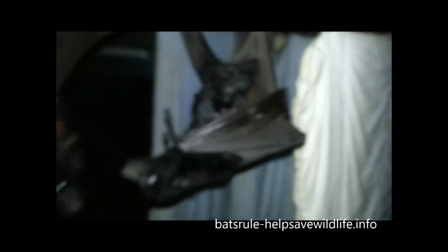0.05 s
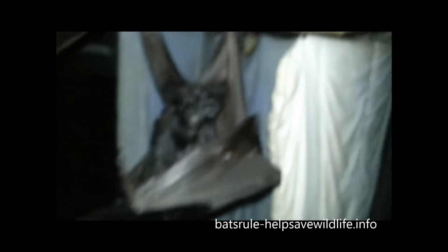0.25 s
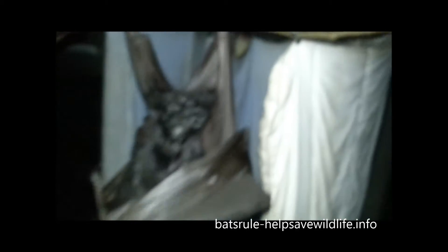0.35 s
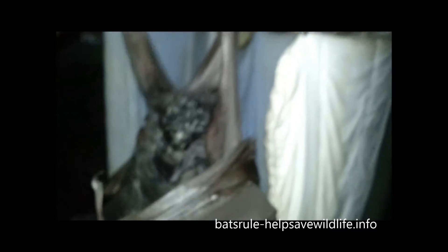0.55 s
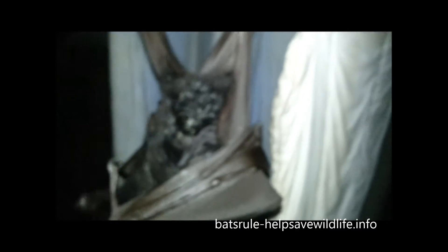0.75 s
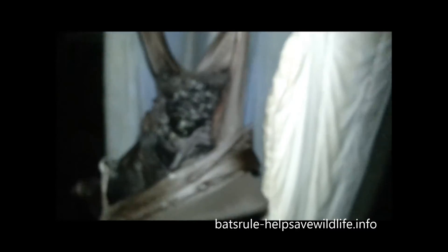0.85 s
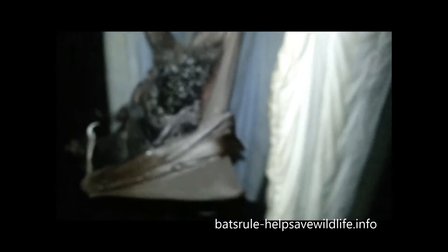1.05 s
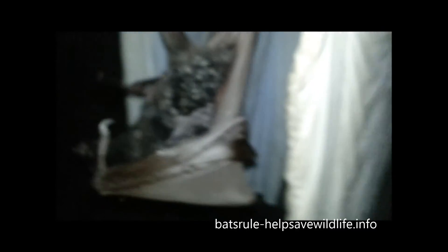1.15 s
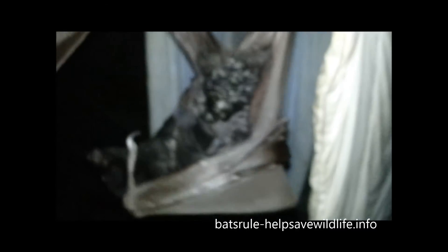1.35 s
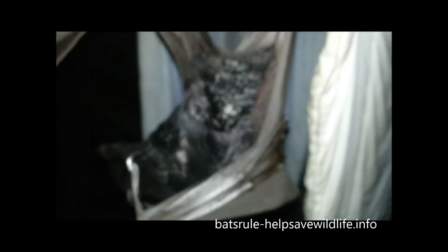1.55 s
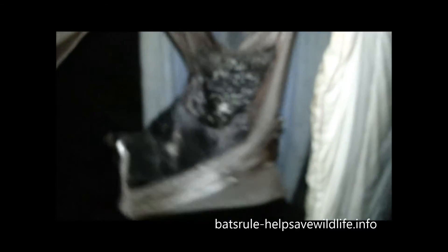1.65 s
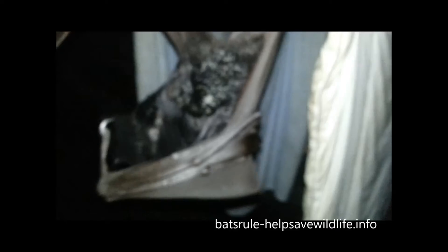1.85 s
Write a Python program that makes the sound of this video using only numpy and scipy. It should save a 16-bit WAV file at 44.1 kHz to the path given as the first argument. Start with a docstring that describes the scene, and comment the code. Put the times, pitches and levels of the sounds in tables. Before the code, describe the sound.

Close to the microphone, a bat lets out a short piercing shriek that roughens into a rapid throaty rasp with squeaky chirps, ends with a low knock and cloth rustle, leaving faint airy room noise and a few ticks.

```python
"""A fruit bat screeches close to the microphone in a small cloth-hung enclosure. A whine of gliding overtones
rises and flares in two mouth resonances as a shrill cry, then roughens. Short gliding sine squeaks and hisses
cut through a hoarse rasp of noisy throat pulses; loud peaks overload. Soft rustles, one short knock and faint
ticks are shaped noise, over quiet background noise."""
import sys
import numpy as np
from scipy import signal
from scipy.fft import rfft, irfft
from scipy.io import wavfile
from scipy.ndimage import uniform_filter1d, map_coordinates

SR = 44100
rng = np.random.default_rng(int(sys.argv[2]) if len(sys.argv) > 2 else 0)


def store_wav(level_fs):
    """Save 16-bit WAV to argv[1]."""
    pcm = np.round(np.clip(np.atleast_2d(level_fs), -1, 1) * 32767)
    wavfile.write(sys.argv[1], SR, pcm.T.astype(np.int16))


N = 83790
T = np.arange(N) / SR


def from_db(db):
    """Decibels to gain."""
    return 10 ** (np.asarray(db) / 20)


def rms_one(x):
    """Scale to unit power."""
    return x / np.sqrt(np.mean(x ** 2) + 1e-20)


def even(x, size):
    """Hold the short-term power at one, over a window of so many samples."""
    return x / np.sqrt(np.abs(uniform_filter1d(x * x, size)) + 1e-12)


def in_time(rows):
    """Draw each column of a timed table as a curve over every sample."""
    s, *columns = np.transpose(rows)
    return [np.interp(T, s, column) for column in columns]


def during(rows):
    """One while a timed table lasts, fading exponentially outside it."""
    outside_s = np.maximum(rows[0][0] - T, T - rows[-1][0])
    return np.exp(-np.maximum(outside_s, 0) / .003)


def per_bin(points):
    """Read a spectrum table at every frequency bin, on a log frequency axis."""
    hz, value = np.transpose(points)
    bin_hz = np.arange(N // 2 + 1) * SR / N
    return np.interp(np.log(bin_hz + 1), np.log(hz), value)


def noise(colour):
    """Stereo noise of a given colour, independent on each side."""
    spectrum = rfft(rng.standard_normal((2, N)))
    return rms_one(irfft(spectrum * from_db(per_bin(colour)), N))


def drift(rate):
    """Smooth random motion of unit power: noise through two equal low-pass poles at a rate in Hz."""
    r = np.exp(-2 * np.pi * rate / SR)
    return rms_one(signal.lfilter([1], [1, -2 * r, r * r], rng.standard_normal(N)))


def band_noise(hz, width):
    """Air noise in one resonance whose centre may move, held at even power."""
    turn = 2 * np.pi * np.cumsum(hz * np.ones(N)) / SR
    return even(drift(width) * np.sin(turn) + drift(width) * np.cos(turn), size=200)


def resonate(x, hz, width):
    """A two-pole resonance applied twice, for steep skirts."""
    r = np.exp(-np.pi * width * np.sqrt(2) / SR)  # each pass is wider than the pair
    section = [(1 - r * r) / 2, 0, (r * r - 1) / 2, 1, -2 * r * np.cos(2 * np.pi * hz / SR), r * r]
    return signal.sosfilt([section, section], x + 1e-18)


def throat(x):
    """The resonances of throat and mouth, ringing in parallel."""
    # resonances: centre_hz, width_hz, gain_db
    formants = [(491, 140, -16.5), (920, 420, -22), (2162, 230, 3.5), (2645, 420, -2.5), (3530, 850, -8),
                (5340, 1100, -2.5), (6440, 1800, -30), (9280, 760, -17.5), (11300, 1200, -18.5)]
    return sum(from_db(db) * resonate(x, hz, width) for hz, width, db in formants)


def background():
    """Quiet air noise and hiss; how alike the two sides are depends on frequency."""
    # colour of the air noise: frequency_hz, relative level per Hz in dB
    air_colour = [(25, -15.5), (60, -13), (130, -4), (230, 0.5), (420, 1), (680, -3.5), (1000, -3.5),
                  (1400, -6.5), (3000, -11), (4400, -11), (5700, -19), (9000, -18.5), (14000, -17.5)]
    # likeness of left and right: frequency_hz, correlation (-1 to 1)
    likeness = [(60, 0), (130, 0.041), (280, .5), (620, 0.49), (1340, -0.3), (2900, 0.091)]
    # slow swell of the noise: time_s, level_db
    air_level = [(0, -53.5), (.75, -52), (1.2, -53.5), (1.55, -52), (1.9, -51)]
    mid, side = rfft(noise(air_colour))
    alike = np.clip(per_bin(likeness), -1, 1)
    both = irfft(np.sqrt(1 + alike) * mid + np.sqrt(1 - alike) * side * [[1], [-1]], N)
    return rms_one(both) * from_db(in_time(air_level)[0])


def cry():
    """A rising whine whose overtones flare in two mouth resonances, turning rough as it breaks."""
    # voice of the opening cry: time_s, pitch_hz, fundamental_db, roughness (0 to 1)
    voice_path = [(.163, 640.2, -58, .1), (.171, 688, -43, 0), (.184, 766.7, -32.5, .05),
                  (.199, 956, -20, 0.09), (.206, 948, -20, 0.12), (.209, 888.7, -19.5, 0.9),
                  (.214, 873.3, -21, 0.26), (.221, 884.9, -18, .18), (.231, 998.5, -16, 0),
                  (.242, 1028, -17, 0.02), (.248, 917.6, -19.5, 0.5), (.256, 807, -30.5, 0.8),
                  (.275, 731, -63.5, 0.7)]
    # the mouth opens, resonances take over: time_s, lower_db, upper_db, upper_centre_hz
    mouth_path = [(.165, -71.5, -73, 4500), (.192, -51, -58.5, 4500), (.2065, -47, -54.5, 4582),
                  (.208, -18, -15.5, 4607), (.2105, -15.5, -4.5, 4740), (.214, -21.5, -14.5, 4475),
                  (.220, -24.5, -9, 4398), (.224, -19.5, -20, 4176), (.229, -11, -9, 3930),
                  (.235, 0.5, -30, 3983), (.243, -0.5, -29.5, 3966), (.250, -10.5, -11, 2839),
                  (.263, -16, -24.5, 2800), (.280, -36.5, -47.5, 2786)]
    # steady resonances colouring the whine: centre_hz, width_hz, gain_db
    whine_peaks = [(1420, 64, 1.5), (2690, 340, -9)]
    lower_hz, lower_width_hz, upper_width_hz = 2122, 480, 470
    whine_db_per_octave = -32
    pitch_jitter, overtone_wobble_db = .078, 1.12
    hiss_db, hiss_follows = -13, .8  # level at a 0 dB resonance; share of the resonances' dB swing

    hz, whine_db, rough = in_time(voice_path)
    lower_db, upper_db, upper_hz = in_time(mouth_path)
    phase = 2 * np.pi * np.cumsum(hz * (1 + pitch_jitter * rough * drift(700))) / SR
    k = np.arange(1, 10)[:, None]  # harmonic numbers
    partials = np.sin(k * phase + rng.uniform(0, 2 * np.pi, k.shape))
    # from the third harmonic up, each one flutters on its own
    partials[2:] *= from_db(overtone_wobble_db * np.array([drift(300) for _ in k[2:]]))

    def peak(centre, width):
        """Gain of each overtone in a resonance; the fundamental gets none."""
        detune = (k * hz / centre - centre / (k * hz)) * centre / width
        return (1 + detune ** 2) ** -.8 * (k > 1)

    whine = from_db(whine_db_per_octave * np.log2(k))
    whine = whine + sum(from_db(db) * peak(centre, width) for centre, width, db in whine_peaks)
    out = from_db(whine_db) * np.sqrt(2) * (whine * partials).sum(0)

    # roughness trades tone for breath at constant power
    resonances = ((lower_hz, lower_width_hz, lower_db), (upper_hz, upper_width_hz, upper_db))
    for centre, width, db in resonances:
        weights = peak(centre, width)
        tone = (weights * partials).sum(0) / np.sqrt((weights ** 2).sum(0) / 2)
        air = band_noise(centre, width) * (1 + .33 * np.sin(phase))  # breath pulses with the pitch
        out += from_db(db) * (np.sqrt(1 - rough ** 2) * tone + rough * air)

    # broad hiss of the open mouth
    hiss = rms_one(throat(rng.standard_normal(N)))
    out += hiss * from_db(hiss_db + hiss_follows * np.maximum(lower_db, upper_db))
    return out * during(voice_path)


def two_ports(voice):
    """As the head turns, the voice reaches the left port later, with less treble and more bass."""
    # the head turns: time_s, left_delay_ms
    head_path = [(.20, 0.14), (.245, 0.24), (.33, .28), (.51, 0.31)]
    left_gain_db, treble_shadow_db, shadow_hz = 2.78, -12.5, 4200
    low_cut = signal.butter(3, 330, "high", fs=SR, output="sos")  # the microphone cuts the low bass
    right = signal.sosfilt(low_cut, voice)
    bass = signal.sosfiltfilt(signal.butter(3, shadow_hz, fs=SR, output="sos"), right)
    treble = right - bass
    left = (bass + from_db(treble_shadow_db) * treble) * from_db(left_gain_db)
    lag_s = in_time(head_path)[0] / 1000
    late_left = map_coordinates(left, [(T - lag_s) * SR], order=3, mode="nearest")
    return np.array([late_left, right])


def enclosure(x):
    """A short dull tail of dense reflections, decaying noise that differs at each port."""
    t60_s, gap_s, dull_hz, level_db = .14, .003, 7500, -13
    t = T[:SR // 2]
    tail = rng.standard_normal((2, len(t))) * from_db(-60 * t / t60_s) * (t > gap_s)
    tail /= np.sqrt((tail ** 2).sum(1, keepdims=True))
    tail = signal.sosfilt(signal.butter(1, dull_hz, fs=SR, output="sos"), tail)
    return from_db(level_db) * signal.fftconvolve(x, tail, axes=1)[:, :N]


def squeaks():
    """Near-pure whistles that swell and glide, each with a faint octave above."""
    # squeaks: peak_s, attack_s, release_s, level_db, pitch_hz at the peak, glide in octaves per s
    whistles = [(0.2537, .0025, .004, 0, 2080, -5.5), (.268, .006, 0.01, -25.5, 2030, -9),
                (.298, 0.0029, .004, -26, 1406, 14.5), (0.307, .003, .005, -41, 1972, 1),
                (0.3255, 0.0026, 0.0054, -7, 2152, 0), (0.333, 0.0023, .005, -11.5, 2169, 4.5),
                (.359, .008, .010, -24.5, 2477, -5), (.505, 0.0021, .004, -11, 2523, -9.5),
                (.513, .004, .0027, -5, 2195, -20), (0.518, .002, 0.0035, -8, 2100, -6.5),
                (.529, .002, .005, -20.5, 2100, -3.5)]
    pitch_jitter, octave_db = .018, -30.5
    out = np.zeros(N)
    waver = 1 + pitch_jitter * drift(284)
    for s, attack, release, db, hz, glide in whistles:
        t = T - s
        pitch = hz * waver * 2 ** (glide * np.clip(t, -.02, .02))
        phase = 2 * np.pi * np.cumsum(pitch) / SR
        swell = np.exp(-(t / np.where(t < 0, attack, release)) ** 2)
        tone = np.sin(phase) + from_db(octave_db) * np.sin(2 * phase)
        out += from_db(db) * np.sqrt(2) * swell * tone
    return out


def rasp():
    """Irregular throat pulses, each with a puff of air, ring the resonances of the mouth."""
    # effort of the hoarse rasp: time_s, level_db
    effort = [(.317, -59.5), (.322, -23), (.330, -24), (.357, -20), (.364, -29), (.377, -28.5), (.391, -18),
              (.426, -21.5), (.431, -24.5), (.438, -19), (.447, -34.5), (.462, -23), (.468, -16),
              (.483, -17.5), (.495, -26.5), (.503, -18.5), (.520, -28.5), (.535, -47.5), (.570, -47.5)]
    pulses_per_s, rate_jitter = 350, .36  # middle rate; spread of its natural log
    puff_decay_s, puff_gain = .0027, .93
    flutter_per_s, flutter_db = 86, 1

    cycles = np.cumsum(pulses_per_s * np.exp(rate_jitter * drift(200))) / SR
    pulses = np.diff(np.floor(cycles), prepend=0)  # a click at each whole cycle
    puff_level = signal.lfilter([1], [1, -np.exp(-1 / (puff_decay_s * SR))], pulses)
    puffs = puff_level * rng.standard_normal(N)
    voice = throat(.5 * rms_one(pulses) + puff_gain * rms_one(puffs))
    # the throat flaps slowly under the fast pulses
    flap_hz = flutter_per_s * np.exp(rate_jitter * drift(40))
    flutter = np.sin(2 * np.pi * np.cumsum(flap_hz) / SR)
    level_db = in_time(effort)[0] + flutter_db * flutter
    return even(voice, size=400) * from_db(level_db) * during(effort)


def spits():
    """Sharp little hisses in the upper mouth resonance as the mouth snaps open."""
    # bursts of hiss: peak_s, half_length_s, level_db, centre_hz
    bursts = [(0.3229, .0017, -18, 4850), (.330, .008, -30.5, 4900), (.503, .004, -20.5, 5600)]
    out = np.zeros(N)
    for s, half, db, hz in bursts:
        out += from_db(db) * np.exp(-((T - s) / half) ** 2) * band_noise(hz, width=650)
    return out


def movements():
    """Wings brush the cloth, one short knock falls among them, and claws tick: all shaped noise."""
    # rustles of wing and cloth, and one short knock at .5215 s: peak_s, half_length_s, level_db
    swells = [(.47, 0.093, -47), (.5215, 0.0026, -29), (.535, 0.036, -42.5), (0.63, 0.037, -41),
              (0.714, 0.063, -58.5), (1.493, 0.0084, -61.5), (1.666, 0.0092, -56.5), (1.764, 0.011, -54)]
    # colour of the rustles and the knock: frequency_hz, relative_db
    swell_colour = [(40, -49.5), (200, -19.5), (580, -2.5), (820, -6.5), (1100, 1.5), (1700, -6.5),
                    (2200, -3), (3200, -13), (6000, -21), (14000, -28)]
    # small claw ticks: start_s, level_db
    ticks = [(.528, -31), (0.546, -40), (0.56, -37), (.655, -47), (1.668, -52), (1.818, -54.5)]
    # colour of the ticks: frequency_hz, relative_db
    tick_colour = [(200, -45), (1000, -14), (2200, -8), (4000, -7), (6500, -6.5), (14000, -13.5)]
    tick_decay_s = .0013
    swell = sum(from_db(db) * np.exp(-((T - s) / half) ** 2) for s, half, db in swells)
    swell = swell * from_db(1.2 * drift(94))  # the level flickers
    tick = sum(from_db(db) * np.exp(-np.abs(T - s) / tick_decay_s) * (T >= s) for s, db in ticks)
    return swell * noise(swell_colour) + tick * noise(tick_colour)


def scene():
    """The bat's voice at two ports and its reflections, with movements over the background."""
    bat = two_ports(cry() + squeaks() + spits() + rasp())
    return bat + enclosure(bat) + movements() + background()


def record(dry):
    """The loudest peaks bend smoothly into overload; then the top is cut."""
    knee = 8  # higher bends later and harder
    clipped = dry / (1 + np.abs(dry) ** knee) ** (1 / knee)
    top_cut = signal.cheby2(14, 40, 14900, fs=SR, output="sos")  # stopband starts at 14900 Hz
    return signal.sosfiltfilt(top_cut, clipped)


dry = scene()
out = record(dry)
store_wav(out)
```